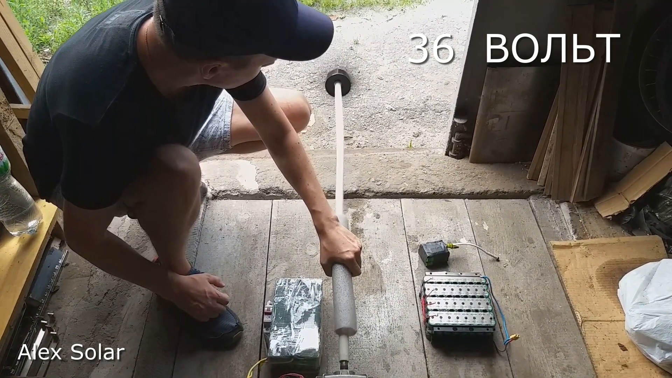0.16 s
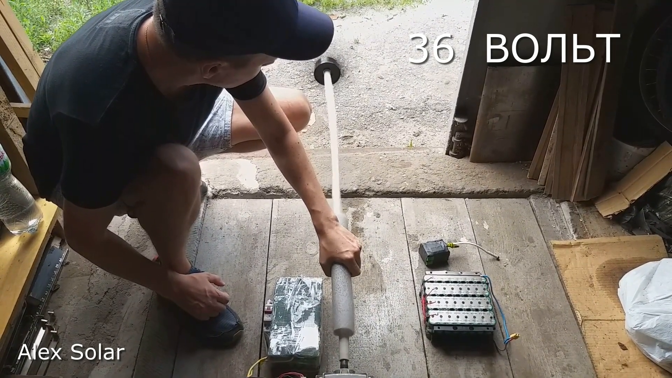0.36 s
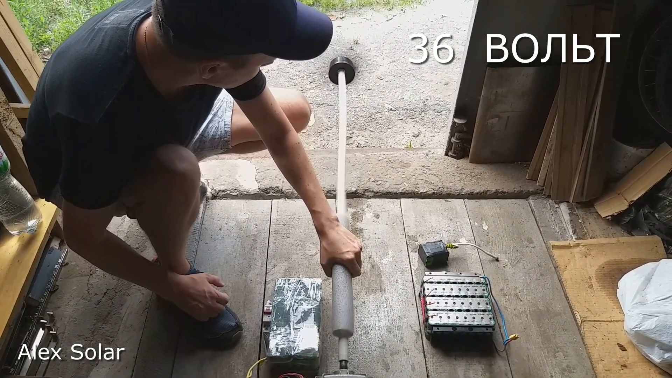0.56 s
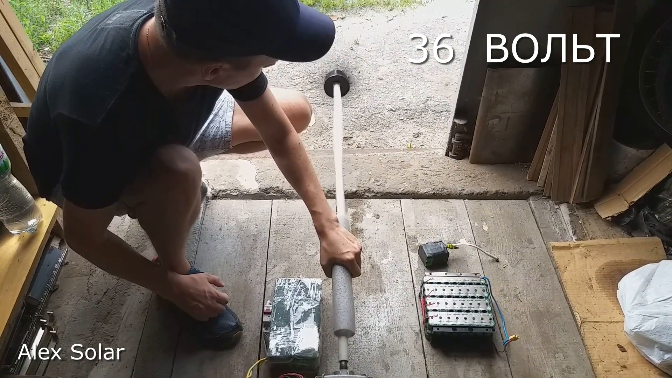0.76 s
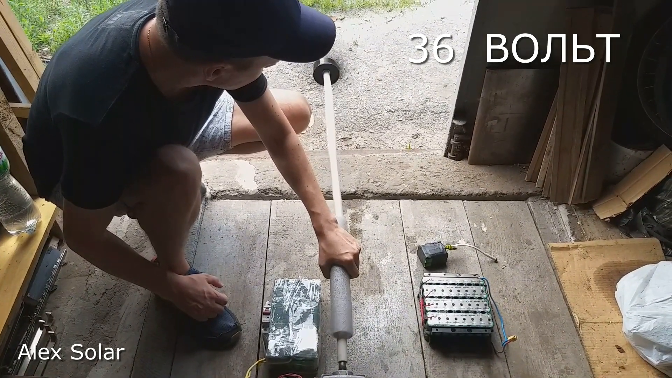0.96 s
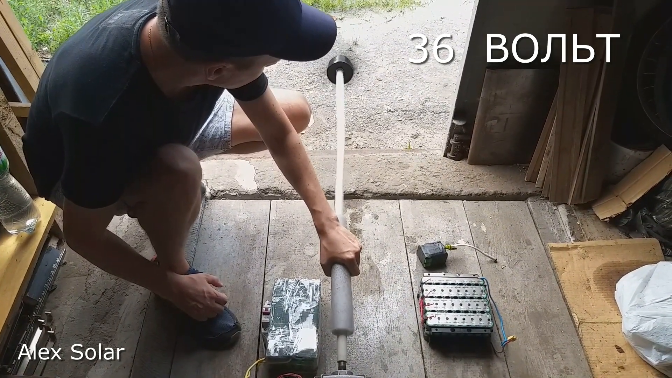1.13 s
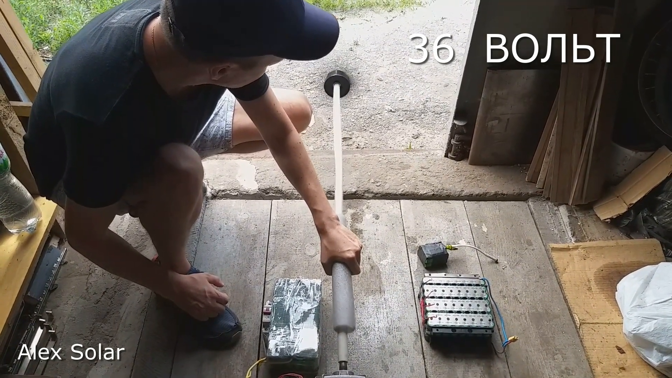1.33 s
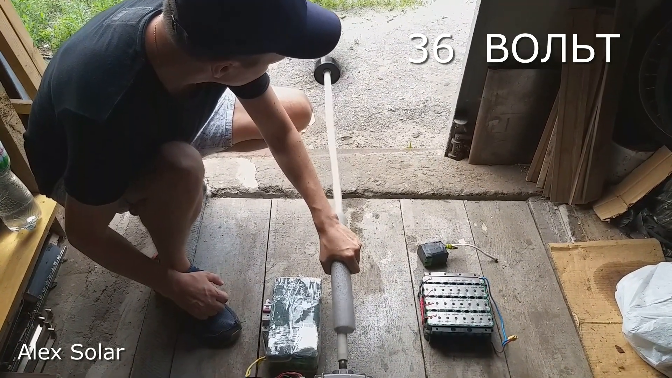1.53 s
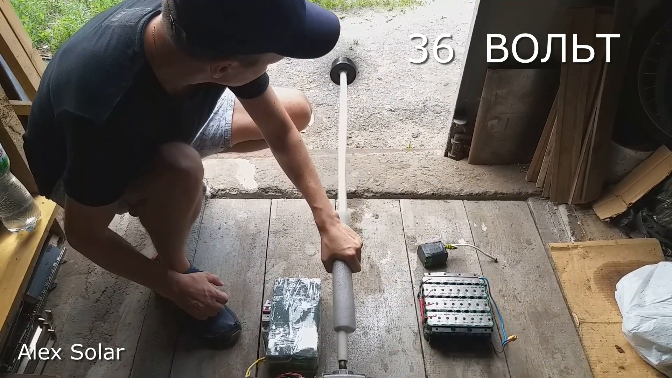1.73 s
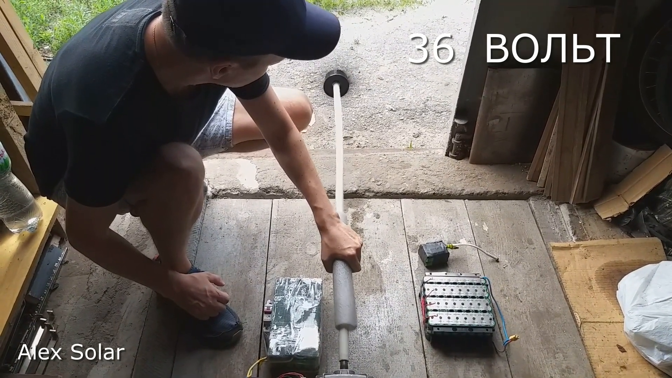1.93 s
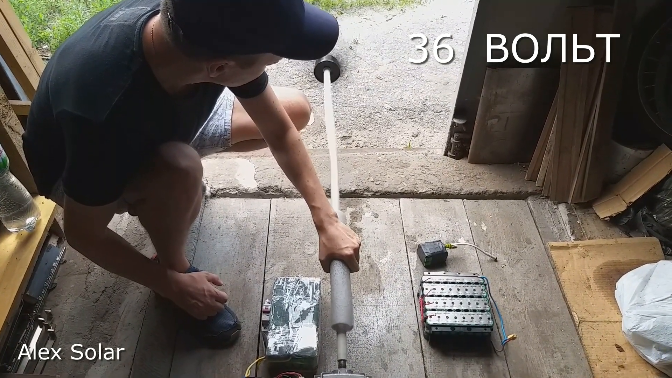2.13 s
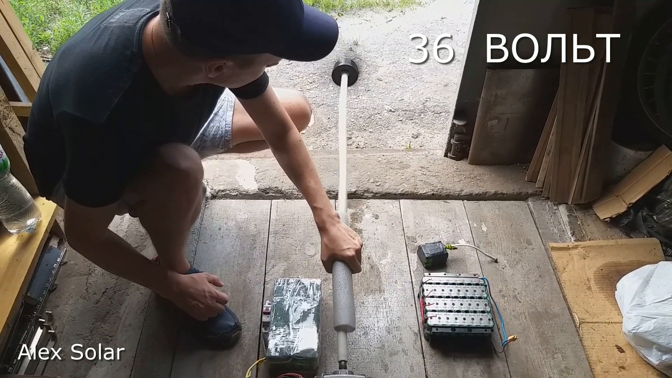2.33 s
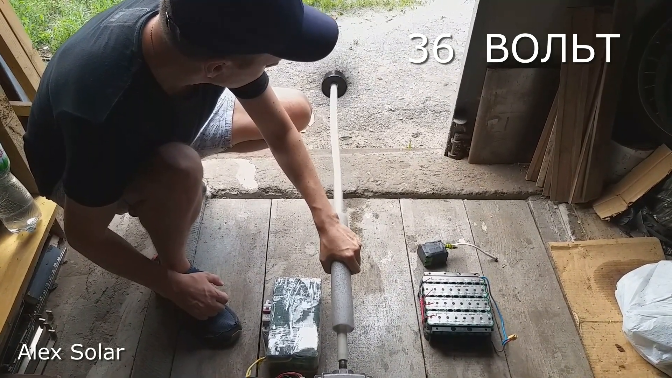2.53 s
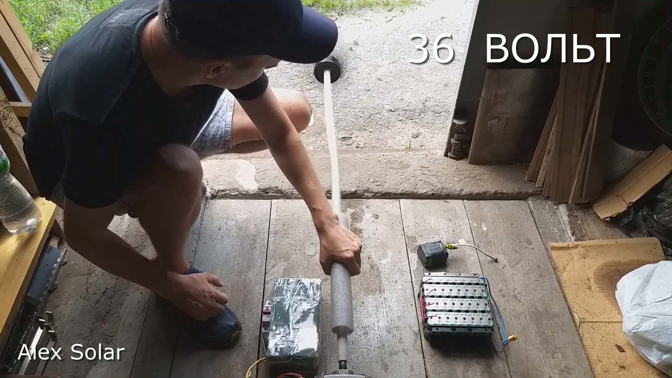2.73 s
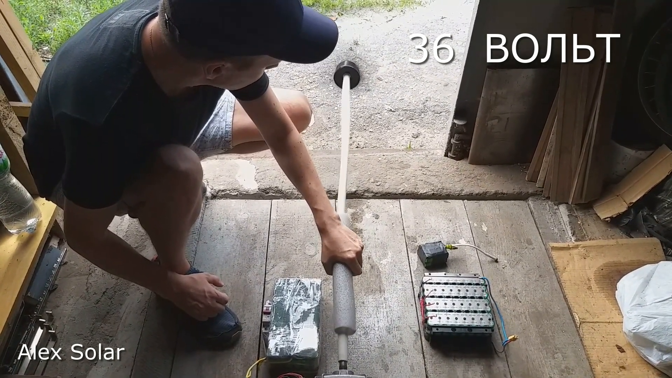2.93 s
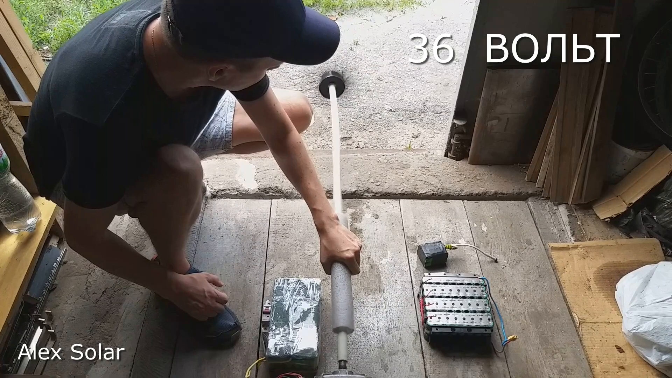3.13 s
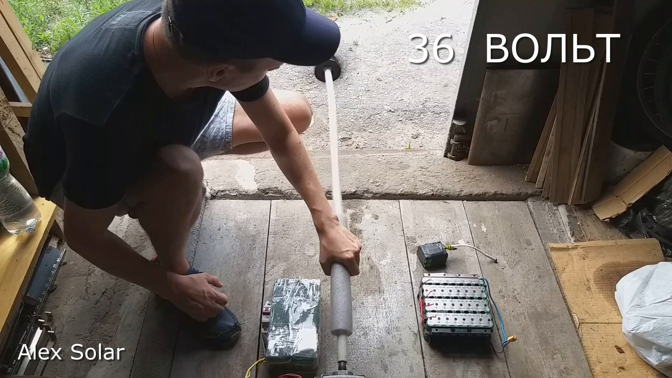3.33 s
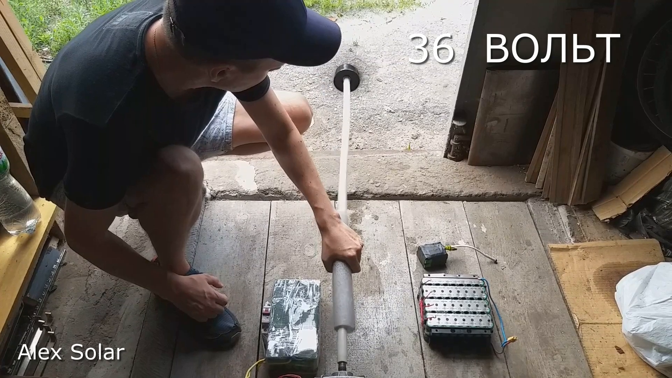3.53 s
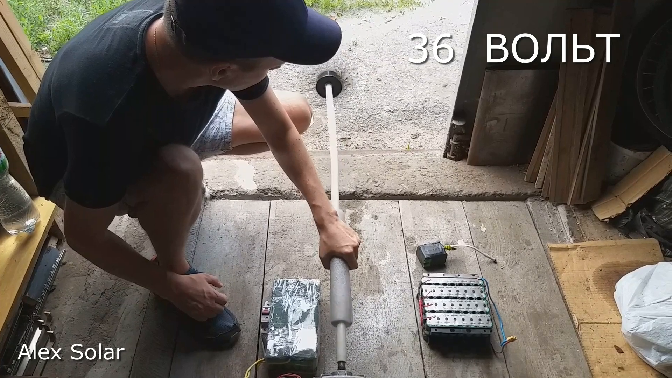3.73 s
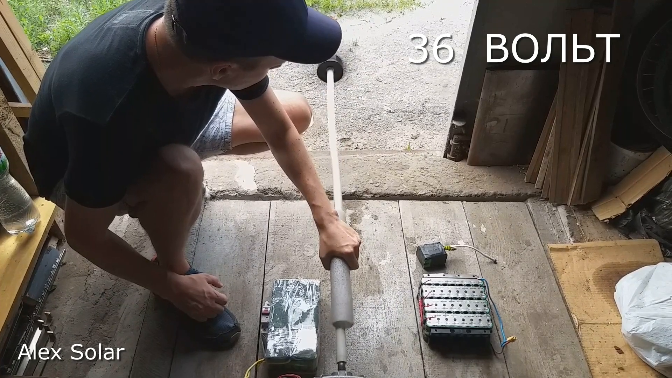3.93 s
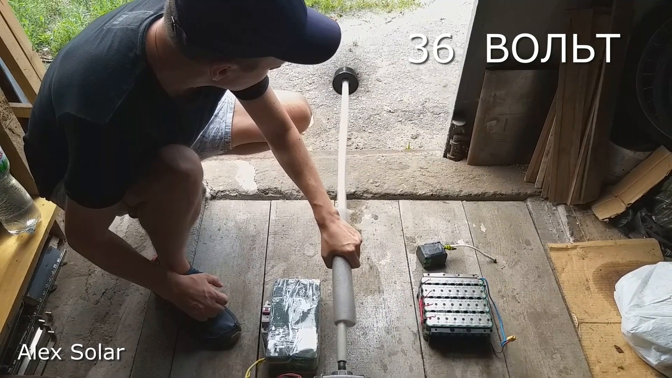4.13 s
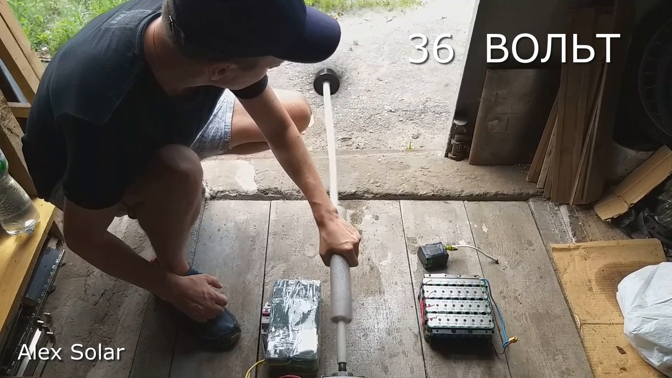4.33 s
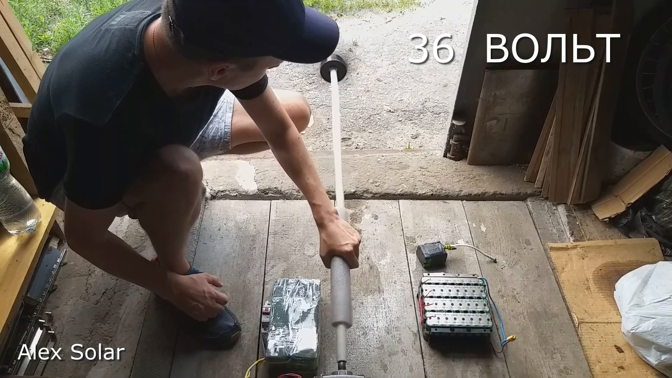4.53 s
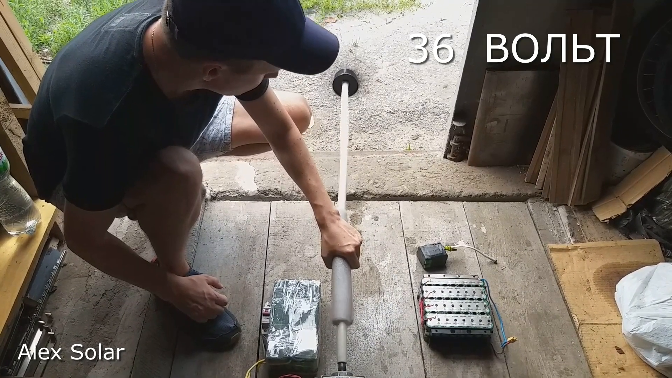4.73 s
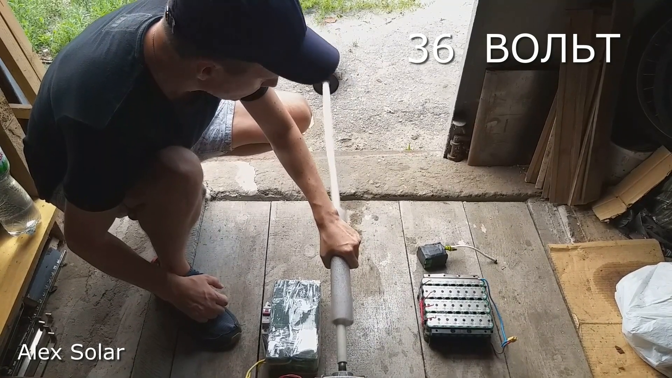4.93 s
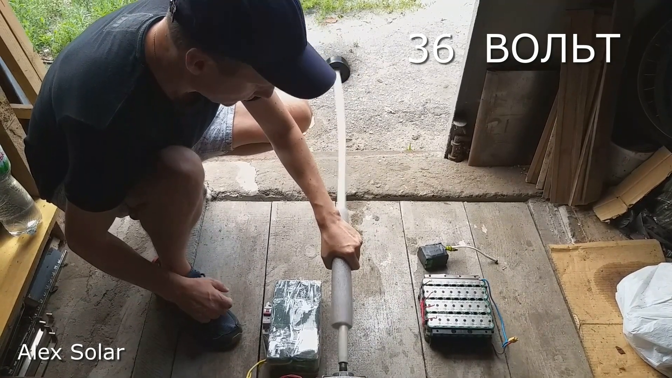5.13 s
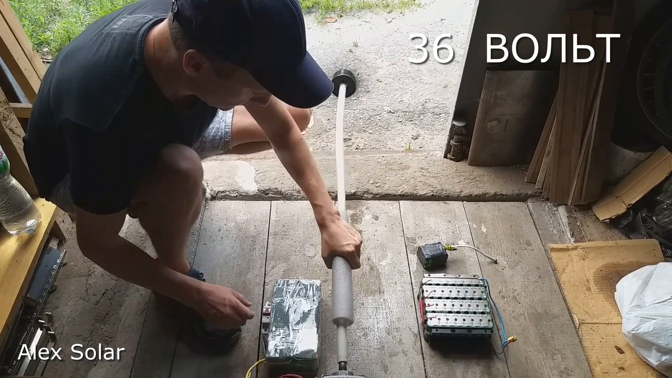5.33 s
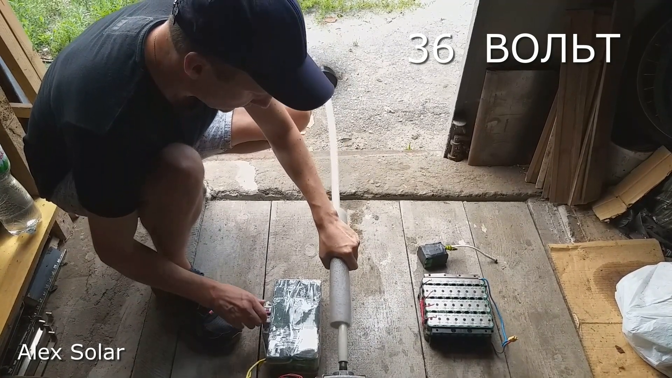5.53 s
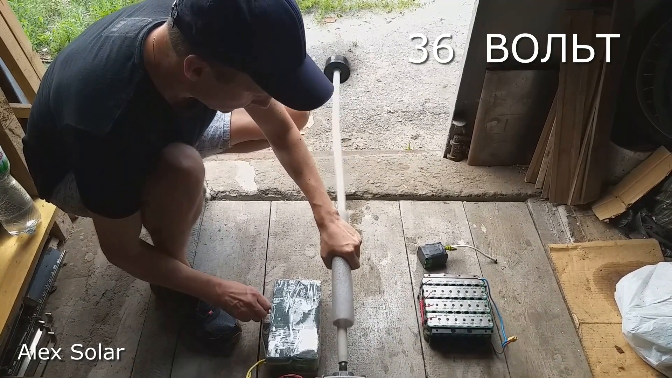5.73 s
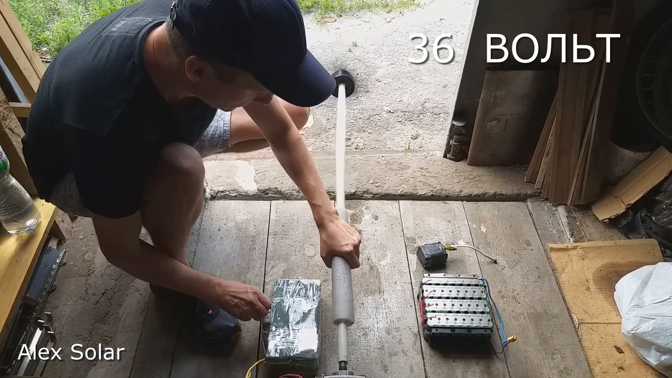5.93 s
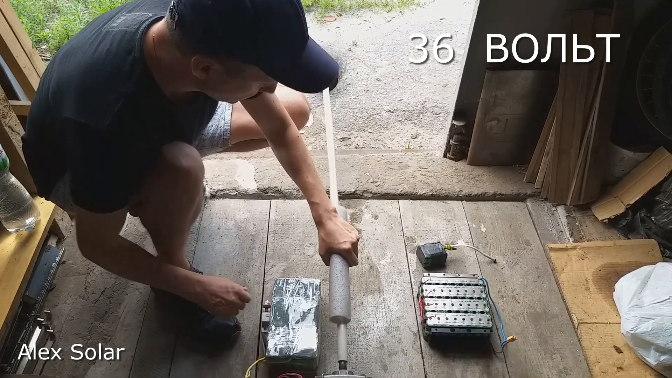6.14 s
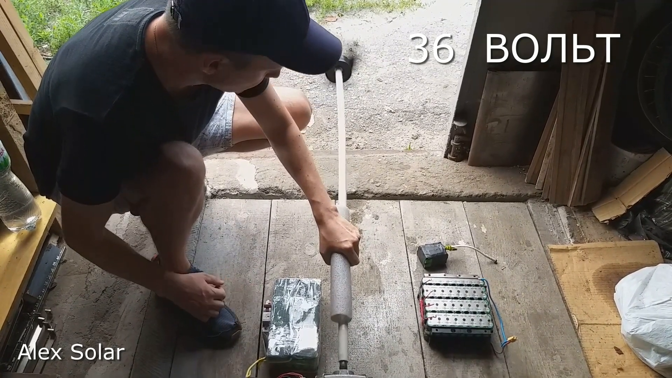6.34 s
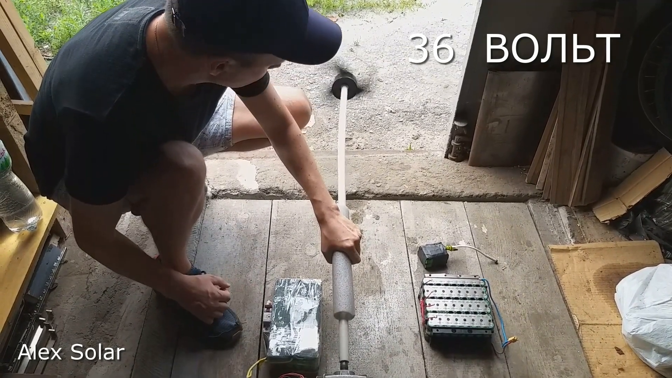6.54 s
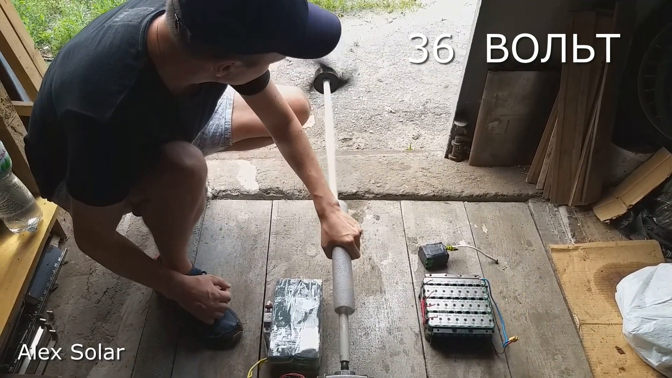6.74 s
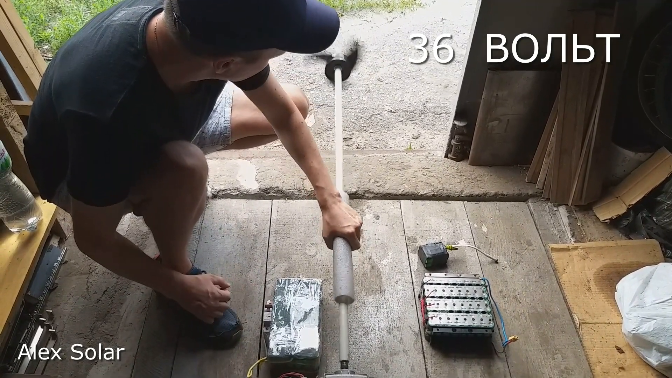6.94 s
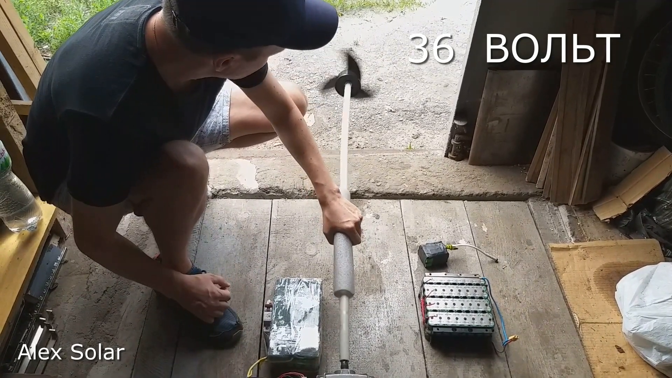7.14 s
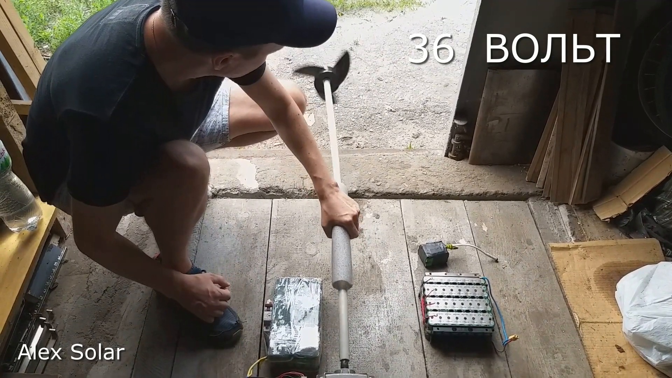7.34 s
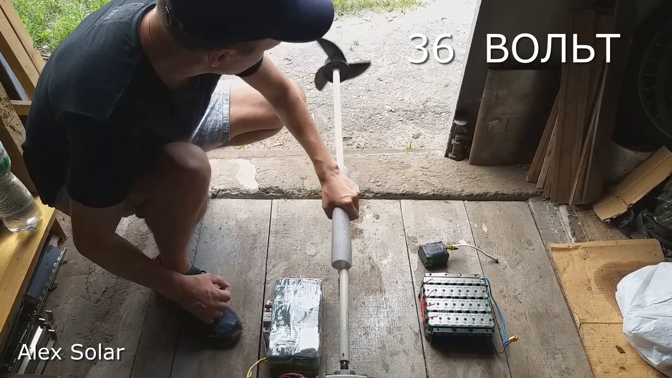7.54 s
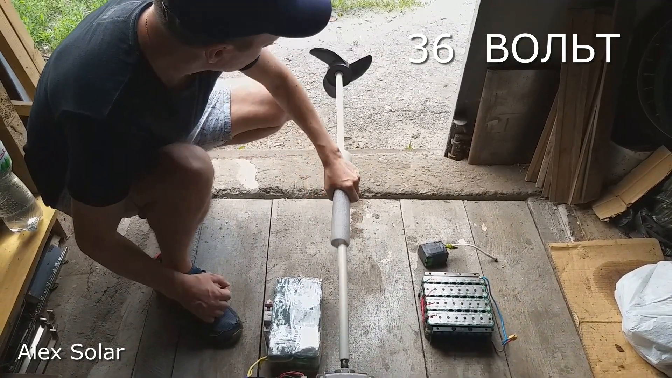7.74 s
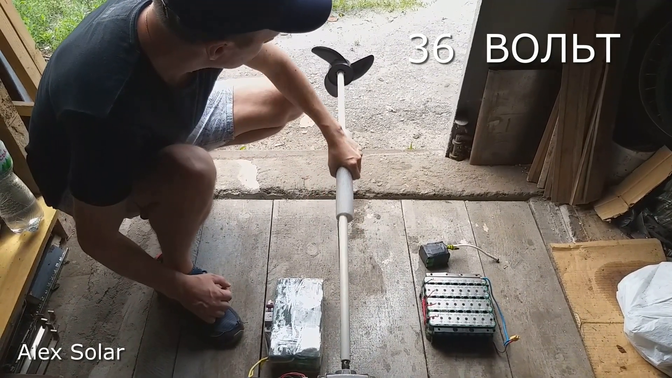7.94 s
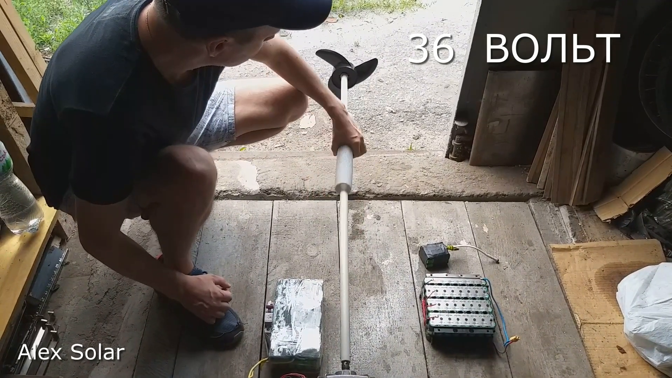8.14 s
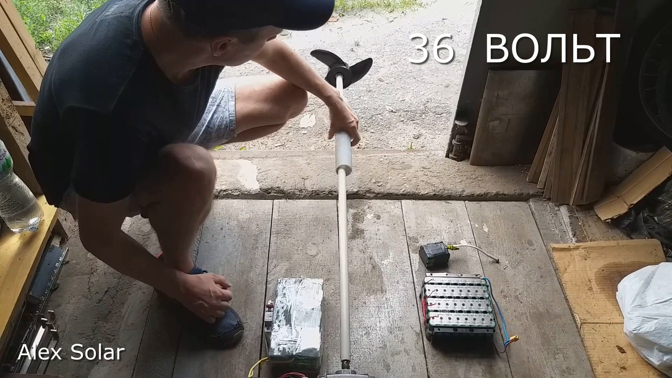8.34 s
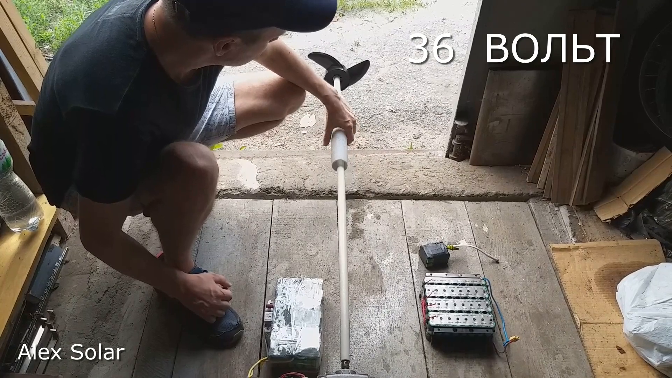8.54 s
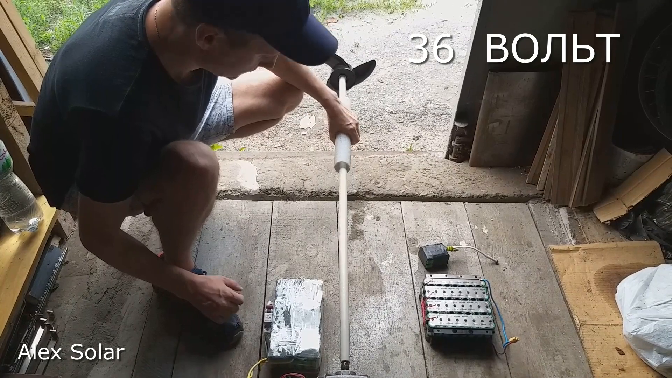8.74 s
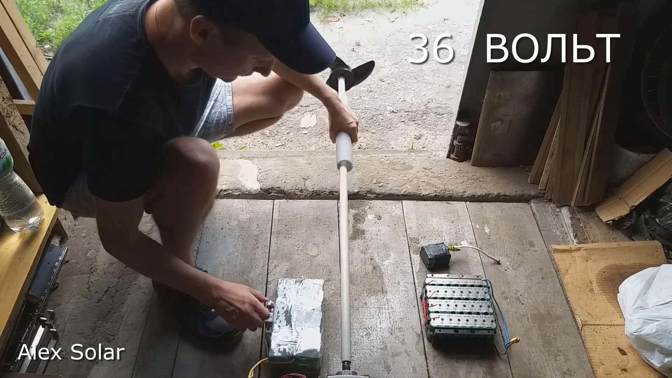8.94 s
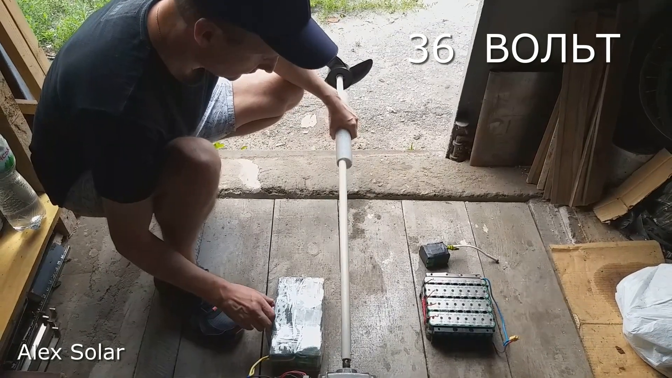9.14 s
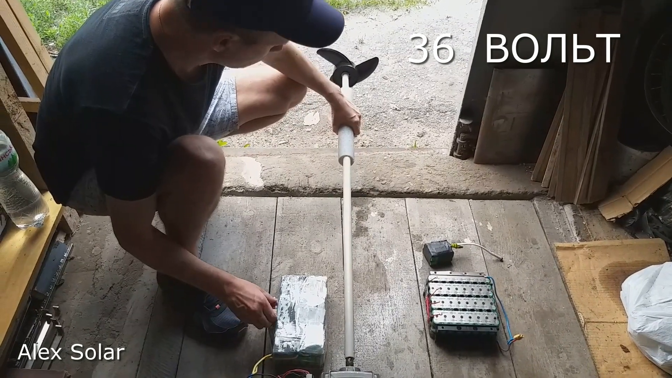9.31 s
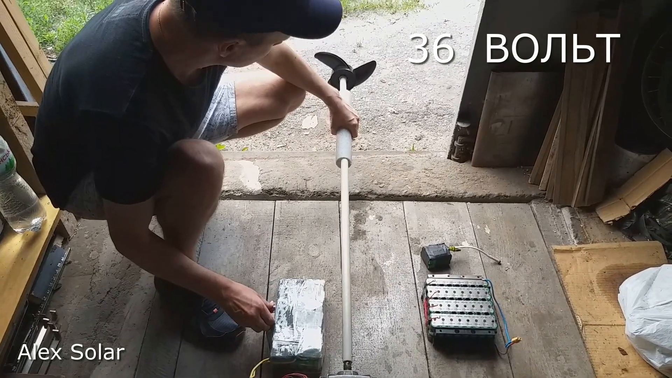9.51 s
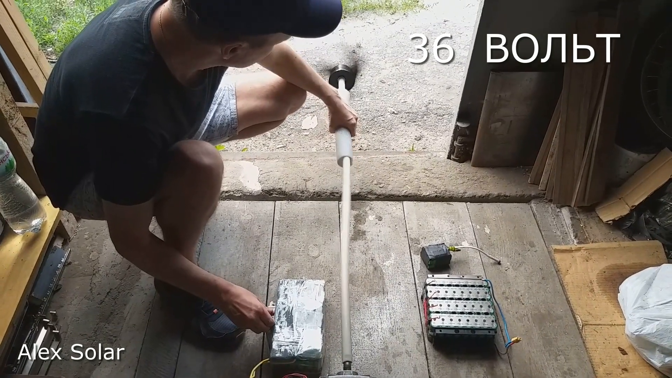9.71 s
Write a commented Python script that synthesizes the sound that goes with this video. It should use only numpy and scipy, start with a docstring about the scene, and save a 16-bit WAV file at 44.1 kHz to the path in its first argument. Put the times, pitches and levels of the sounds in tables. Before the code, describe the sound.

A propeller shaft turns fast in a hand-steadied tube, rattling and grinding dozens of times a second over a deep hum, with occasional hard clacks. Nearly six seconds in, a hard click stops the power. Dull bumps and separate, slowing whooshes run down, overlapped by hissing slides of the sleeve. A quiet pause holds faint rustles and air, then the rattle suddenly returns. Close, dry stereo pickup in a doorway of a wooden shed.

```python
"""In a shed doorway an electric motor spins a propeller in the air on a long thin shaft, hand-steadied in a loose sleeve.
The bent shaft hums at orders of its turn, knocks once a turn, and chatters, scrapes and hisses as shaped contact noise.
The switch snaps off as decaying bursts and box modes; the shaft coasts down in slowing swishes of friction.
The sleeve is slid along it as swelling noise, and at the end the motor starts again. Faint air noise lies beneath."""
import sys
import numpy as np
from scipy import signal
from scipy.fft import rfft, irfft
from scipy.io import wavfile

SR = 44100
rng = np.random.default_rng(int(sys.argv[2]) if len(sys.argv) > 2 else 0)


def pcm_store(signal):
    """Save signal as 16-bit PCM."""
    levels = np.round(np.clip(np.atleast_2d(signal), -1, 1) * 32767)
    wavfile.write(sys.argv[1], SR, levels.astype(np.int16).T)


N = 430857
T = np.arange(N) / SR  # s
FREQS = np.arange(N + 1) * SR / (2 * N)  # Hz, for a transform padded to twice the length

# shaft slowing, standing and starting again: time_s, speed_hz (turns per second)
COAST = [(5.77, 36.8), (5.9, 33.53), (6.1, 28.22), (6.3, 25.12), (6.5, 21.74), (6.7, 17.64), (6.9, 15.71),
         (7.04, 11.7), (7.25, 7.95), (7.52, 2.8), (7.75, 0), (9.6, 0), (9.77, 30)]
# the swaying shaft bears on the sleeve: centre_s, half_length_s, chatter_rise_db
PRESSES = [(0.21, 0.053, 8.5), (0.59, 0.17, 8.5), (1.11, 0.19, 8), (1.42, 0.045, 3.5), (1.73, 0.093, 6),
           (2.2, 0.34, 3), (2.48, 0.13, 6.5), (2.94, 0.11, 9), (3.15, 0.11, 7.5), (3.46, 0.11, 6.5),
           (3.67, 0.07, 6.5), (4.14, 0.11, 5), (4.58, 0.18, 2.5), (4.82, 0.058, 5.5), (5.3, 0.12, 7.5)]
# spectrum of the chatter: frequency_hz, level_db
CHATTER_COLOUR = [(300, -1.5), (750, 3.5), (1100, -3.5), (1400, -4), (1650, -1.5), (2200, -3.5),
                  (2700, -3.5), (3500, -10), (6000, -26)]
# resonances of the sleeve tube: frequency_hz, width_hz, level_db
TUBE = [(1141, 26, 7), (1334, 85, -1.5), (1415, 39, 5), (1841, 36, -1), (2098, 15, 7.5), (2250, 130, -6.5),
        (3200, 74, -10), (4450, 920, -13.5), (8060, 320, -4)]
# air noise: frequency_hz, level_db
AIR = [(18, -53.5), (30, -25), (102, -7.5), (394, -23.5), (881, -27), (1000, -28.5), (15000, -36)]
OFF_S, ON_S, FULL_S = 5.77, 9.59, 9.778  # switch-off, restart, full level again


def undb(db):
    """Amplitude ratio: decibels to gain."""
    return 10 ** (np.asarray(db) / 20)


def curve(rows):
    """Piecewise-linear motion: rows of (time_s, value) joined by straight lines."""
    rows = np.array(rows)
    return np.interp(T, rows[:, 0], rows[:, 1])


def unit(x):
    """Normalisation: scale to a standard deviation of 1."""
    return x / np.std(x)


def through(x, response):
    """Linear filtering: multiply the spectrum by a frequency response."""
    return irfft(rfft(x, 2 * N) * response)[:N]


def colour(points):
    """Minimum-phase response, by the cepstrum, with (frequency_hz, level_db) gains, closed below the first."""
    hz, db = np.transpose(points)
    gain = undb(np.interp(np.log(FREQS + 1), np.log(hz), db))
    gain = gain * np.minimum((FREQS + 1) / hz[0], 1) ** 2
    cepstrum = irfft(np.log(gain))[:N]
    cepstrum[0] /= 2
    return np.exp(rfft(2 * cepstrum, 2 * N))


def resonances(rows):
    """Damped resonators (frequency_hz, width_hz, level_db) in parallel with a flat path."""
    return 1 + sum(undb(db) * 1j * FREQS * width / (hz ** 2 - FREQS ** 2 + 1j * FREQS * width)
                   for hz, width, db in rows)


def noise(response):
    """Spectral shaping: random noise coloured by a response, at unit level."""
    return unit(through(rng.standard_normal(N), response))


def rung(envelope, response):
    """Forced resonance: a noisy force with this rms envelope rings a body."""
    force = rng.standard_normal(N) * envelope
    return through(force, response) / np.sqrt(np.mean(np.abs(response) ** 2))


def walk(rate):
    """Random modulation: chance values, this many per second, joined by straight lines."""
    return np.interp(T * rate, np.arange(N), rng.standard_normal(N))


def per_turn(turns):
    """Cycle-to-cycle scatter: a new random value for every turn."""
    return rng.standard_normal(N)[(turns - np.floor(turns[0])).astype(int)]


def burst(turns, at, width):
    """Cyclic impact: a sudden rise at one angle of each turn that then dies away (both in turns)."""
    return np.exp(-((turns - at) % 1) / width)


def fall(start, t60):
    """Exponential decay: a sudden onset that loses 60 dB in t60 seconds."""
    return undb(-60 * np.maximum(T - start, 0) / t60) * (T >= start)


def swells(rows):
    """Slow level modulation: sum in dB of bell-shaped swells (centre_s, half_length_s, rise_db)."""
    return sum(db * np.exp(-((T - s) / half) ** 2) for s, half, db in rows)


def powered(law, whip):
    """Driven contact: gain follows presses and whip, dies after switch-off and climbs at the restart."""
    run_on_s = 0.03  # the shaft keeps flinging itself at the sleeve this long after switch-off
    db, share, whip_db, fall_db_per_s, rise_db_per_s = law
    since_off = np.maximum(T - OFF_S - run_on_s, 0)
    running = undb(share * swells(PRESSES) + whip_db * whip - fall_db_per_s * since_off)
    restart = undb(rise_db_per_s * np.minimum(T - FULL_S, 0)) * (T > ON_S)
    return undb(db) * (running + restart)


def dragged(law, speed):
    """Coasting friction: gain is a power of the speed; law is (level_db at coast_hz, db_per_halving of speed)."""
    coast_hz = 25
    db, halving_db = law
    return undb(db + halving_db * np.log2(np.clip(speed / coast_hz, 1e-3, 1.2))) * (T > OFF_S)


def sway():
    """Angular modulation: turns by which the swaying shaft is held back or let go."""
    # one swelling sway: widest_s, half_length_s, period_s, lag_turns
    widest_s, half, period, lag = (2.82, 1.6, .55, .045)
    return lag * np.exp(-((T - widest_s) / half) ** 2) * np.cos(2 * np.pi * (T - widest_s) / period)


def hum(turns, speed, whip):
    """Rotor vibration: a bent shaft swings at orders of its turn; whipping adds half orders and rumble."""
    # lower orders of the turn: multiple, relative_level_db
    low_orders = [(1, -19.5), (2, -22.5), (3, 0)]
    # half orders, which repeat every second turn: multiple, level_db before resonance and whip
    half_orders = [(3.5, -44.5), (4.5, -44), (5.5, -43.5), (6.5, -49)]
    # upper orders, which grow as the shaft bows: multiple, level_db before resonance and whip, bow_share
    high_orders = [(4, -47.5, 0.86), (5, -47, 0.97), (6, -41, .2), (7, -48, 0.35)]
    # the shaft bows: centre_s, half_length_s, rise_db
    bows = [(.6, .15, 4), (1.38, .13, 9), (1.93, .17, 9), (2.95, .12, 7), (3.75, .17, 11), (4.35, .17, 9)]
    # the hum dips briefly: centre_s, half_length_s, depth_db
    hum_dips = [(0.33, 0.065, 3), (1.56, 0.061, 10.5), (2.14, 0.11, 4.5), (2.76, 0.14, 8.5),
                (3.0, 0.046, 10.5), (4.02, 0.087, 15.5), (4.62, 0.029, 8), (5.14, 0.099, 13)]
    # bending resonances that lift an order as it passes: frequency_hz, width_hz, lift_db
    bends = [(121, 9.7, 13), (236, 26, 4), (266.6, 14, 13.5)]
    # spectrum of the whipping rumble: frequency_hz, level_db
    whip_colour = [(78, -31.5), (100, -12), (113, -2.5), (170, -8), (250, -0.5), (340, -6.5), (600, -9.5),
                   (1000, -23.5)]
    hum_db, hum_hz, hum_db_per_hz = -40, 38, -0.5  # the low orders swell as speed sags below hum_hz
    edge_hz, rumble_db = 86, -33.5  # upper and half orders die below the edge; rumble is for a whip of 1
    hum_fall_db_per_s, rumble_fall_db_per_s = 136, 31.5  # after switch-off
    settled_hz = 19.9  # below this speed the shaft no longer whips

    def partial(k, db):
        """Harmonic motion: a sinusoid at the nearest whole or half order of the turn."""
        order = np.round(2 * k) / 2
        return undb(db) * np.sqrt(2) * np.sin(2 * np.pi * (order * turns + rng.random()))

    def lift_db(k):
        """Resonant amplification: an order's gain near each bending resonance and below the edge."""
        order_hz = np.round(2 * k) / 2 * speed
        lift = sum(db / (1 + ((order_hz - hz) / (width / 2)) ** 2) for hz, width, db in bends)
        return lift - np.maximum(edge_hz - order_hz, 0)

    sag_hz = np.maximum(speed, COAST[0][1]) - hum_hz
    low_db = hum_db + hum_db_per_hz * sag_hz - swells(hum_dips)
    low = sum(partial(k, db + low_db + 1.5 * walk(2.3)) for k, db in low_orders)
    high = sum(partial(k, db + share * swells(bows) + lift_db(k) - 6.5 * whip + 1.8 * walk(7))
               for k, db, share in high_orders)
    halves = sum(partial(k, db + lift_db(k) + 3 * walk(6.7)) for k, db in half_orders)
    pulsing = rng.standard_normal(N) * (1 + burst(turns, 0.14, 0.37))
    rumble = whip * undb(rumble_db) * unit(through(pulsing, colour(whip_colour)))
    coasting = np.maximum(T - OFF_S, 0)
    swinging = undb(-rumble_fall_db_per_s * coasting) * np.clip((speed - settled_hz) / 3, 0, 1)
    return low * undb(-hum_fall_db_per_s * coasting) + (high + whip ** 2 * halves + rumble) * swinging


def knocks(turns, speed, whip):
    """Dispersive bending waves: a knock a turn runs down the shaft highs first and returns from the ends."""
    # spectrum of the shaft's knock: frequency_hz, level_db
    knock_colour = [(100, -41.5), (160, -19), (300, -8), (370, -10.5), (445, 3), (490, -6), (560, 2),
                    (603, 6), (628, 3.5), (675, 9.5), (740, -7), (810, 5.5), (875, -8.5), (935, -6.5),
                    (1020, -17.5), (1400, -28), (4000, -36.5)]
    # level under power: level_db, press_share, full_whip_change_db, fall_db_per_s, restart_rise_db_per_s
    knock_law = (-28.5, -0.17, -7.5, 81, 656)
    # stray hard knocks while the shaft slows: time_s, relative_level_db
    stray_knocks = [(6.12, -45), (6.176, -46), (6.252, -44), (6.268, -48.5)]
    loose_db, loose_hz = -54.5, 24.4  # soft knocks go on down to this speed
    detune, grip_per_press_db = .035, .04  # share by which grip moves resonances; tightening per dB of press

    # whipping makes the knocks uneven in time and strong and weak by turns
    alternate = np.cos(np.pi * turns)
    count = np.floor(turns + whip * (.009 * walk(30) + .02 * whip * alternate))
    strength = undb(.6 * per_turn(turns + .5) + 4 * whip ** 2 * alternate)
    blows = (np.diff(count, prepend=count[0]) > 0) * strength
    travel = np.exp(-4j * np.pi * .003 * np.sqrt(600 * FREQS))
    shaft = colour(knock_colour) * travel
    # the grip tightens and eases, moving the resonances of the shaft up and down
    grip = np.clip(.5 + 0.46 * walk(5) + grip_per_press_db * (swells(PRESSES) - 4), 0, 1) * np.pi / 2
    eased, tight = (colour(np.array(knock_colour) * [1 + way * detune, 1]) * travel for way in (-1, 1))
    wave = through(blows * np.cos(grip) ** 2, eased) + through(blows * np.sin(grip) ** 2, tight)
    stray_blows = sum(undb(db) * (np.arange(N) == int(s * SR)) for s, db in stray_knocks)
    strays = through(stray_blows, shaft)
    # echoes (lag s, share), each wandering in strength
    wave = wave + sum(np.roll(wave, int(lag * SR)) * share * (1 + .7 * walk(7))
                      for lag, share in [(.0052, .2), (.0083, .29), (.0146, .3)])
    loose = undb(loose_db) * np.clip((speed - loose_hz) / 2, 0, 1)
    return (wave * np.hypot(powered(knock_law, whip), loose) + strays) / np.std(wave[:N // 2])


def roughness(turns, whip):
    """Periodic surface roughness: the same spots meet the sleeve each turn, slowly change, and scatter in whip."""
    repeat_share, grain_db = .75, 4  # power share repeating without whip; scatter of the grains
    angle = turns + (.002 + .006 * whip) * walk(90)
    places = np.arange(1100) / 1100  # turns
    spots = rng.standard_normal((4, len(places))) * undb(grain_db * rng.standard_normal((4, len(places))))
    weights = np.array([walk(3) for _ in spots])
    track = sum(weight * np.interp(angle, places, row, period=1) for weight, row in zip(weights, spots))
    track = unit(track / np.linalg.norm(weights, axis=0))
    repeats = np.clip(repeat_share * (1 - whip ** 2), 0, 1)
    fresh = unit(rng.standard_normal(N) * undb(grain_db * walk(1500)))
    return np.sqrt(repeats) * track + np.sqrt(1 - repeats) * fresh


def pushed():
    """Sliding friction: gains of hiss and scrape as each push of the sleeve swells, holds and dies away."""
    # pushes along the shaft: start_s, length_s, hiss_db, scrape_db
    pushes = [(6.744, 0.16, -42.5, -54), (6.823, 0.44, -38, -50.5), (7.274, 0.19, -43, -59.5),
              (7.51, 0.16, -42, -63), (7.659, 0.57, -47, -65), (8.057, 0.13, -67, -60),
              (8.405, 0.025, -52.5, -73), (8.561, 0.12, -67, -87), (8.707, 0.066, -62.5, -74),
              (8.905, 0.12, -60.5, -77), (9.062, 0.16, -61.5, -81)]
    attack_s, t60_s = 0.031, 0.41
    power = 0
    for s, length, hiss_db, scrape_db in pushes:
        rise = np.clip((T - s) / attack_s, 0, 1)
        shape = rise * undb(-60 * np.maximum(T - s - length, 0) / t60_s)
        power = power + np.outer(undb([hiss_db, scrape_db]), shape) ** 2
    return np.sqrt(power)


def rubbing(turns, speed, whip):
    """Contact friction: hits chatter and scrape through the tube's resonances, and dragging on the wall hisses."""
    # spectra of hiss and scrape: frequency_hz, level_db
    hiss_colour = [(3000, -35.5), (5600, -14), (6500, -8), (7300, -5.5), (8100, -3), (9000, -1.5),
                   (10000, -5.5), (11500, -9), (12600, -8), (14000, -11), (15800, -10)]
    scrape_colour = [(1200, -30.5), (2600, -11.5), (3300, -5.5), (3950, 0.5), (4500, 1), (5500, -3),
                     (6500, -6), (9000, -19.5)]
    # levels under power: level_db, press_share, full_whip_change_db, fall_db_per_s, restart_rise_db_per_s
    chatter_law = (-33.5, 1, -2, 59.5, 431)
    scrape_law = (-38.5, 0.2549, -0.5, 38.5, 180)
    hiss_law = (-31, 0.076, 3, 54, 166)
    # levels while coasting, weaker as the shaft slows: level_db, db_per_halving of speed
    chatter_drag = (-60.5, 24)
    scrape_drag = (-51, 14)
    hiss_drag = (-41, 7.8)
    push_chatter_db = -22.5  # relative to the scrape of a push
    smooth_hiss_hz = 9450  # above this the hiss barely follows the turn

    tube = resonances(TUBE)
    fast = np.clip((speed - 31) / 5, 0, 1)
    # coasting, the shaft drops on the wall once a turn; the slower it turns, the longer it leans there
    angle = turns % 1
    drop = np.clip((angle - speed / 160 - .02) / .06, 0, 1)
    lean = drop * np.exp(-(angle / np.clip(.88 - speed / 110, .5, 1)) ** 5)
    lean = lean * undb(1.8 * walk(100))
    swish_depth = np.clip(speed / 3.4, 0, 1) * (T < 9)
    swish = 1 + swish_depth * (.04 + speed / 52 + (1.25 - speed / 55) * lean - 1)

    def contact(at, width, depth, scatter_db, swishing):
        """Amplitude-modulated contact force: a hit each turn at speed, long swishes when slow."""
        hits = 1 + depth * burst(turns, at, width) * undb(scatter_db * per_turn(turns))
        hits = hits * undb(1.6 * walk(400))
        return fast * hits / np.sqrt(np.mean(hits[:N // 2] ** 2)) + (1 - fast) * swish ** swishing

    # pressed hard, the separate strokes merge into a grind
    pressure = np.clip((swells(PRESSES) - 2) / 10, 0, 1)
    strokes = .6 * contact(.04, .28, 3.2 - .9 * pressure, 2, .6)
    strokes = strokes + .25 * contact(.22, .2, 2.5, 3, .6) + .15 * contact(.7, .15, 5, 3, .6)
    drag = .65 * contact(.33, .11, 2.6, 1.4, .9) + .35 * contact(.03, .17, 3.8, 2, .9)
    chatter = unit(through(roughness(turns, whip) * strokes, colour(CHATTER_COLOUR) * tube))
    scrape = noise(colour(scrape_colour) * tube) * contact(.02, .09, 1.1, 2.6, .6)
    # the top of the hiss runs on between the strokes
    top = 1 / (1 + (smooth_hiss_hz / (FREQS + 1)) ** 12)
    rub = noise(colour(hiss_colour) * tube)
    hiss = through(rub, 1 - top) * drag + through(rub, top) * contact(.03, .3, .7, 4, 1)
    push_hiss, push_scrape = pushed()
    layers = [(chatter, chatter_law, chatter_drag, undb(push_chatter_db) * push_scrape),
              (scrape, scrape_law, scrape_drag, push_scrape),
              (hiss, hiss_law, hiss_drag, push_hiss)]
    # driven, coasting and pushed contact add in power
    return sum(sound * np.sqrt(powered(law, whip) ** 2 + dragged(coast, speed) ** 2 + push ** 2)
               for sound, law, coast, push in layers)


def clacks():
    """Broadband impact: the shaft strikes the sleeve squarely, a sharp crack that rings the tube."""
    # square hits: time_s, level_db
    square_hits = [(.157, -25), (.232, -24), (.282, -21), (.382, -27), (2.378, -24), (2.429, -23),
                   (2.478, -23), (2.604, -21), (2.655, -26), (2.877, -25), (3.143, -25), (4.667, -25),
                   (4.722, -27), (4.776, -24)]
    # spectrum of the crack: frequency_hz, level_db; then its decay t60_s
    clack_colour = [(500, -6), (800, 0), (2200, -2), (4500, -7), (9000, -15), (15000, -22)]
    t60_s = .04
    crack = noise(colour(clack_colour) * resonances(TUBE))
    return crack * sum(undb(db) * fall(s, t60_s) for s, db in square_hits)


def switch():
    """Impulsive modal excitation: contact snaps and light finger taps ring the switch and its box."""
    # snaps of the switch and light taps of the fingers: start_s, level_db, t60_s
    clicks = [(5.7703, -7, .018), (5.776, -13, .13), (5.795, -23, .11), (9.278, -60, .02),
              (9.358, -64, .15), (9.593, -56, .07)]
    # spectrum of the crack: frequency_hz, level_db
    switch_colour = [(100, -22), (600, -17), (1800, -10), (2900, -1), (4300, 0), (5800, -4), (7600, 1),
                     (9500, -3), (12000, -11), (16000, -15)]
    # modes of the switch and its box: frequency_hz, relative_level_db, t60_s
    switch_modes = [(3100, -2, .06), (3540, -6, .06), (3935, -1, .055), (5360, -3, .05), (7680, -7, .05),
                    (8720, -7, .05), (9760, -5, .06)]
    crack = noise(colour(switch_colour)) * sum(undb(db) * fall(s, t60) for s, db, t60 in clicks)
    t = T[:SR // 2]
    ring = sum(undb(db) * np.exp(-np.log(1000) * t / t60) * np.sin(2 * np.pi * hz * t)
               for hz, db, t60 in switch_modes)
    return crack + undb(-15) * signal.fftconvolve(crack, ring / np.linalg.norm(ring))[:N]


def bumps():
    """Impact response: single bumps of shaft and hand give dull thuds, each with its own share of clatter."""
    # bumps: start_s, thud_db, t60_s, treble_db (clatter relative to thud)
    bump_rows = [(5.894, -39, 0.17, 9), (5.954, -34, 0.082, 0), (6.016, -38.5, 0.12, -2),
                 (6.267, -46, 0.15, -2), (6.39, -54, .25, -14), (6.81, -55, 0.26, -9),
                 (6.841, -52, 0.19, -1), (6.865, -41.5, 0.39, -3), (7.06, -59, .17, -12),
                 (7.125, -62, .15, -13), (9.234, -55, 0.14, -30), (9.273, -51, 0.08, -28),
                 (9.39, -57, 0.045, -24), (9.712, -57, 0.49, -18), (9.738, -48, 0.56, 6)]
    # spectrum of the thud: frequency_hz, level_db
    bump_colour = [(50, -54), (85, -10), (120, 10), (190, 5.5), (340, 3), (600, -12), (1000, -22),
                   (2500, -26)]
    thud = sum(undb(db) * fall(s, t60) for s, db, t60, _ in bump_rows)
    clatter = sum(undb(db + treble_db) * fall(s, t60) for s, db, t60, treble_db in bump_rows)
    return rung(thud, colour(bump_colour)) + rung(clatter, colour(CHATTER_COLOUR))


def whirr(turns, speed):
    """Sustained resonance: coasting keeps the tube ringing, weaker as it slows, with a high chirp once a turn."""
    # ringing of the tube: frequency_hz, width_hz, relative_level_db
    whirr_modes = [(2380, 260, 0), (3210, 260, -.5)]
    # level while coasting: level_db, db_per_halving of speed
    whirr_drag = (-63, 8)
    # a high chirp once a turn: frequency_hz, width_hz, level_db
    hz, width, db = (8250, 700, -36)
    ticks = burst(turns, speed / 160 + .04, .13) * np.clip((speed - 15) / 4, 0, 1) * (T > OFF_S)
    chirps = rung(undb(db) * ticks, (resonances([(hz, width, 0)]) - 1) ** 2)
    ringing = noise((resonances(whirr_modes) - 1) ** 2) * dragged(whirr_drag, speed)
    return (ringing + chirps) * (T < ON_S)


def slides():
    """Band-limited noise: squeaks and rustles of hand, sleeve and shaft swell softly, with two short bright ticks."""
    # squeaks, rustles and ticks (the 2 ms rows): centre_s, half_length_s, level_db, centre_hz, width_hz
    slide_rows = [(8.18, .12, -75, 1980, 460), (8.1, .2, -55, 13300, 4500), (8.151, .002, -43, 11500, 7000),
                  (9.15, .08, -63, 8600, 2200), (9.68, .04, -73, 780, 400), (9.697, .002, -35, 9500, 5000)]
    return sum(undb(db) * np.exp(-((T - s) / half) ** 2) * noise(np.exp(-((FREQS - hz) / (width / 2)) ** 2))
               for s, half, db, hz, width in slide_rows)


def shed(x, t60=0.085, wet_db=-13):
    """Reverberation: a short wooden room adds exponentially decaying diffuse reflections."""
    t = T[:SR // 2]
    tail = rng.standard_normal(len(t)) * np.exp(-np.log(1000) * t / t60) * (t > .005)
    return x + undb(wet_db) * signal.fftconvolve(x, tail / np.linalg.norm(tail))[:N]


def scene():
    """Superposition of sources that follow the shaft's turning, its separate events and steady air noise."""
    # shaft speed under power: time_s, speed_hz (turns per second)
    driven = [(0.0, 40.27), (0.28, 39.68), (0.52, 41.03), (1.16, 39.86), (1.32, 38.64), (2.02, 38.78),
              (2.88, 40.91), (2.96, 41.48), (3.68, 39.09), (3.85, 37.8), (4.13, 38.88), (4.4, 37.2),
              (4.67, 38.27), (4.96, 37.49), (5.35, 38.08), (5.5, 36.95)]
    # how far the shaft whips about in the sleeve: time_s, level_db
    whip_rows = [(0, -17.5), (2.1, -6), (2.45, -6), (2.8, -14), (3.9, -6.5), (4.25, -4.5), (5.0, -3.5),
                 (5.35, -0.5), (5.8, -1.5)]
    # bands leaning to one side: centre_hz, half_width_hz, in_phase_share, quarter_cycle_ahead_share
    leans = [(1850, 502, 0.079, .21), (8900, 640, -.06, -0.21)]
    slack_s, air_db, mic_hiss_db = 7.515, -71, -90  # the mic hiss is added in opposite phase

    speed = curve(np.vstack([driven, COAST]))
    turns = np.cumsum(speed) / SR - sway()
    turns = turns - np.interp(slack_s, T, turns)  # angle zero: the shaft hangs clear of the wall
    whip = undb(curve(whip_rows))
    struck = shed(knocks(turns, speed, whip) + switch() + bumps() + clacks())
    machine = struck + hum(turns, speed, whip) + rubbing(turns, speed, whip) + whirr(turns, speed)
    mid = machine + slides() + undb(air_db) * noise(colour(AIR))
    # the chatter leans a little left, the hiss a little right
    lean = sum((level + 1j * lead) * np.exp(-np.abs((FREQS - hz) / half) ** 4)
               for hz, half, level, lead in leans)
    side = through(mid, lean) + undb(mic_hiss_db) * noise(colour(AIR))
    return np.array([mid + side, mid - side])


def record(dry):
    """Band limiting: clip at full scale, then cut the top with a steep elliptic low-pass."""
    top_hz = 15800
    low_pass = signal.ellip(10, .2, 70, top_hz, fs=SR, output="sos")
    return signal.sosfilt(low_pass, np.clip(dry, -1, 1))


dry = scene()
out = record(dry)
pcm_store(out)
```